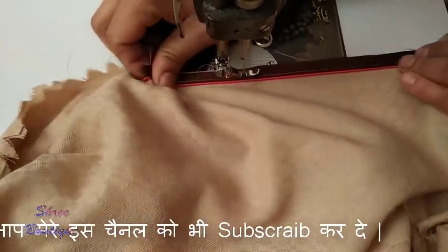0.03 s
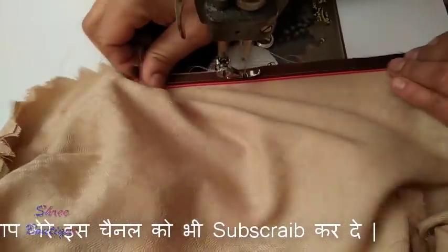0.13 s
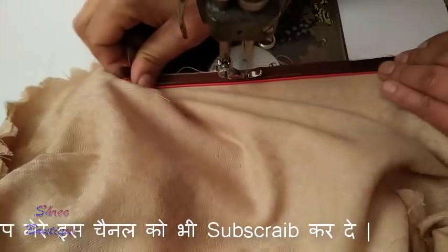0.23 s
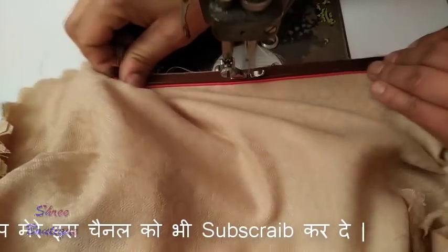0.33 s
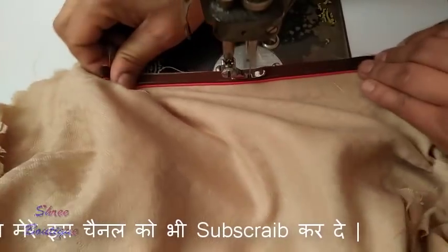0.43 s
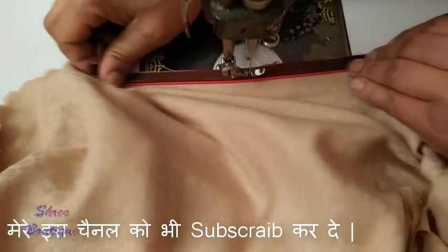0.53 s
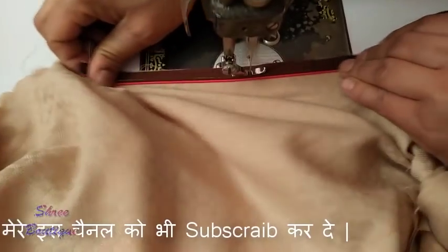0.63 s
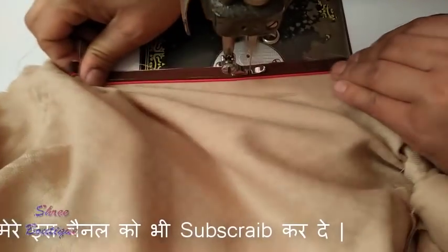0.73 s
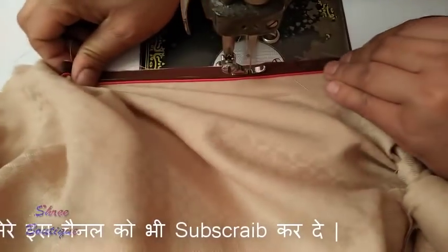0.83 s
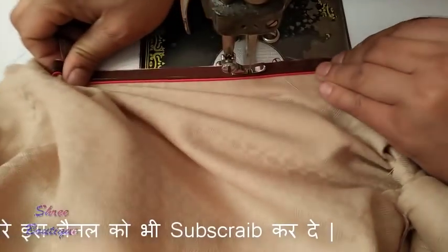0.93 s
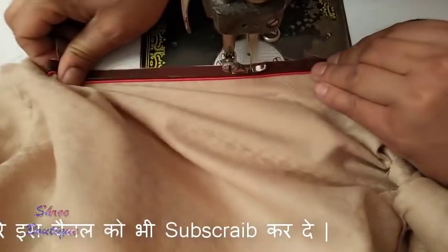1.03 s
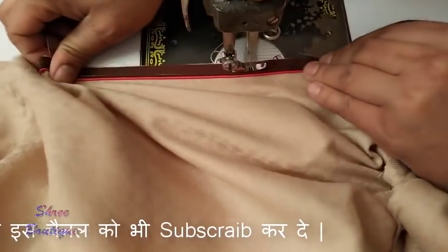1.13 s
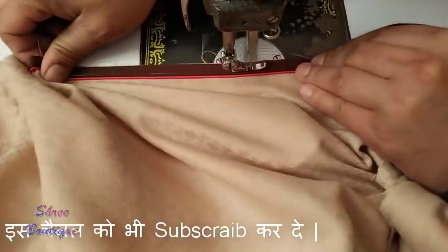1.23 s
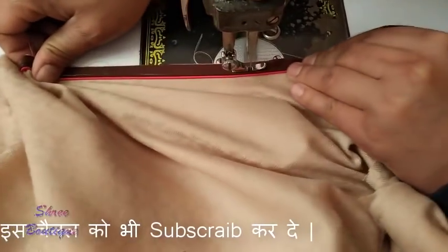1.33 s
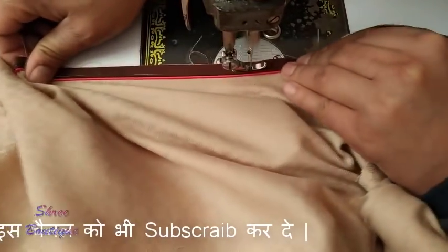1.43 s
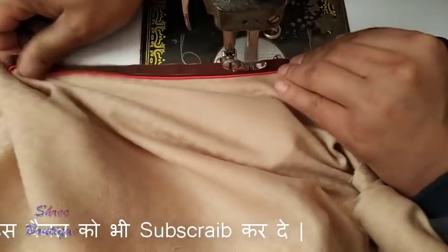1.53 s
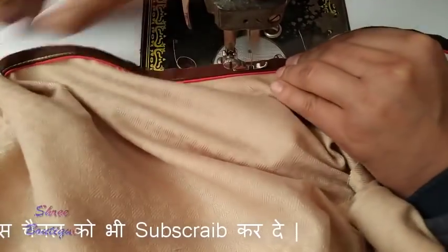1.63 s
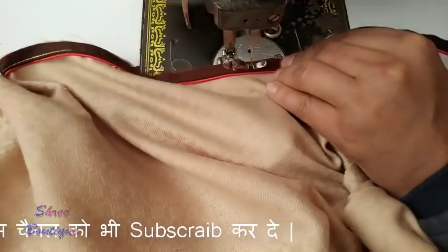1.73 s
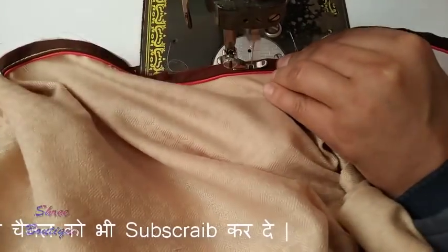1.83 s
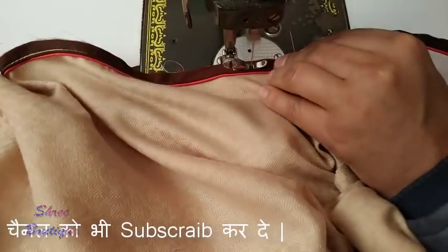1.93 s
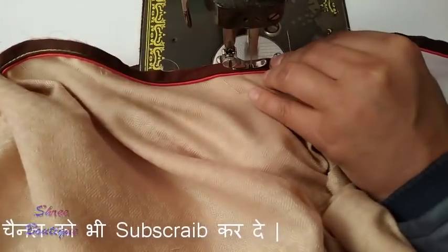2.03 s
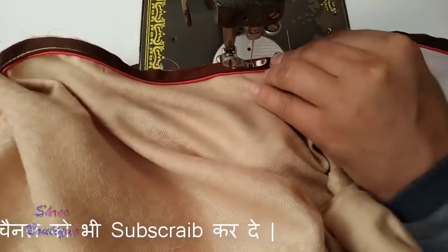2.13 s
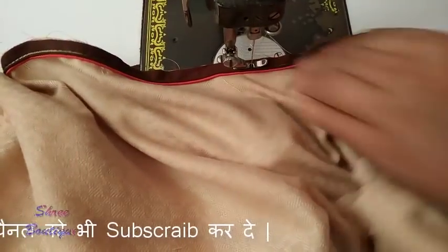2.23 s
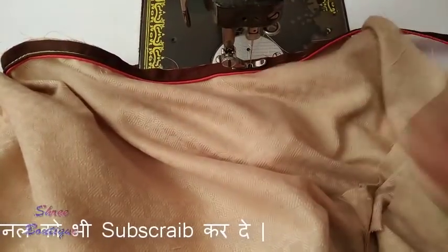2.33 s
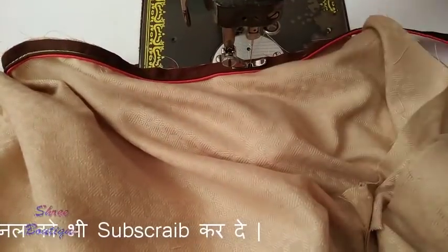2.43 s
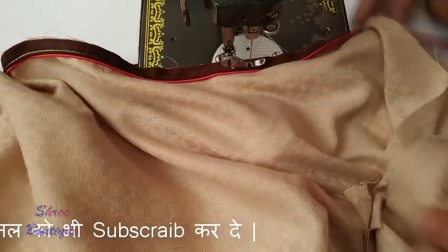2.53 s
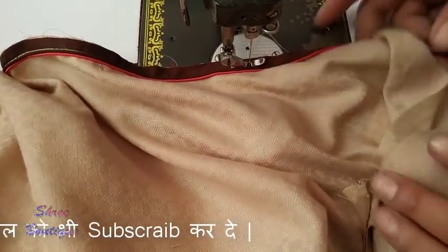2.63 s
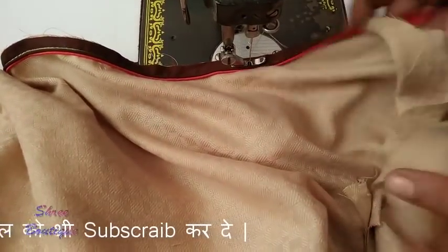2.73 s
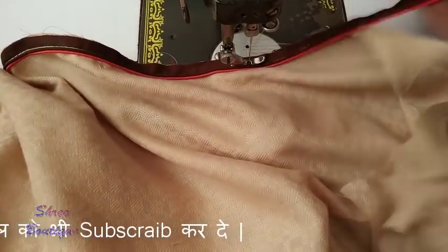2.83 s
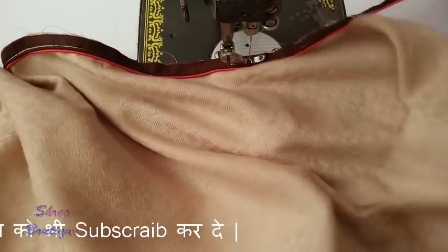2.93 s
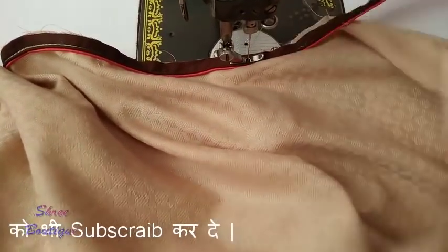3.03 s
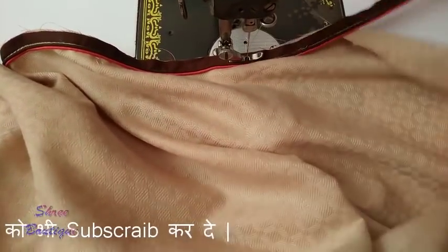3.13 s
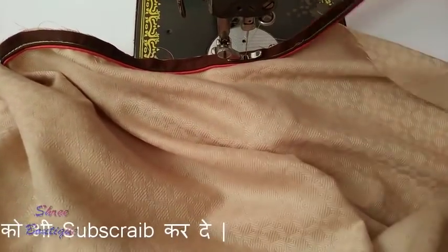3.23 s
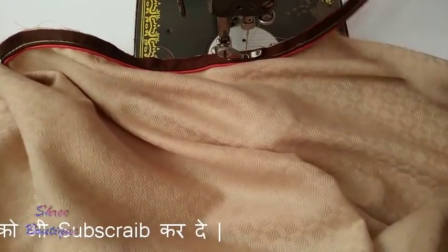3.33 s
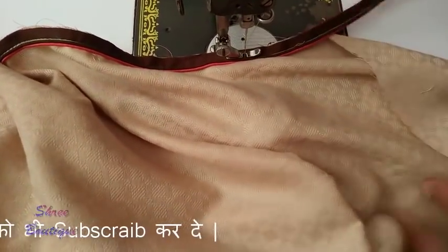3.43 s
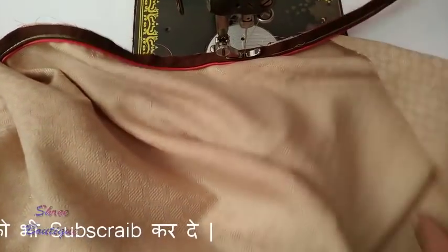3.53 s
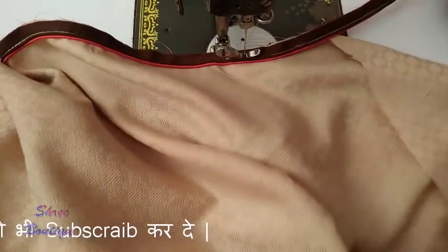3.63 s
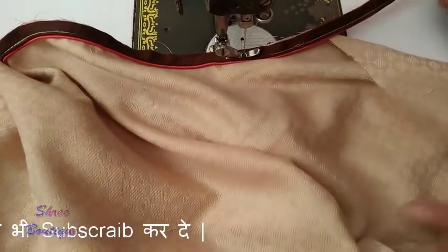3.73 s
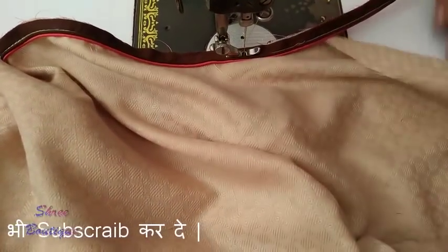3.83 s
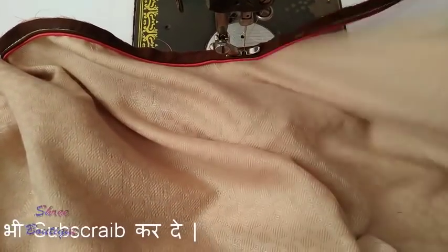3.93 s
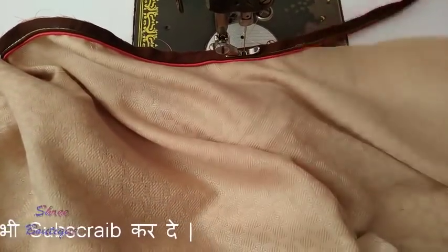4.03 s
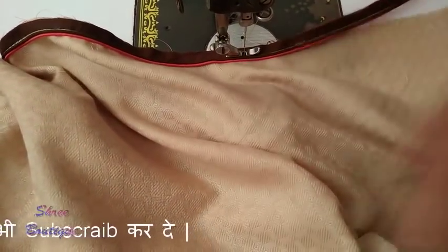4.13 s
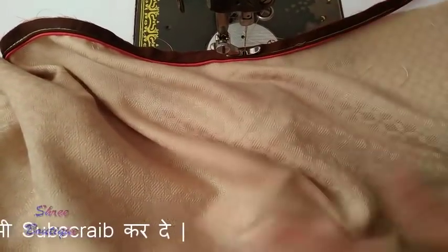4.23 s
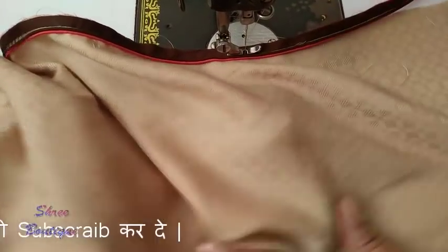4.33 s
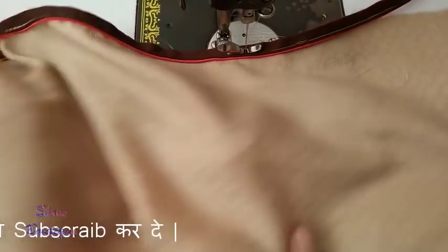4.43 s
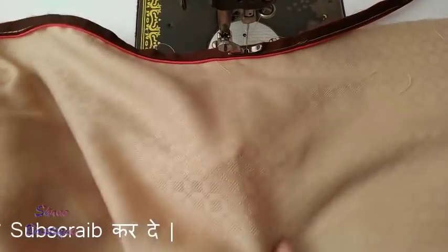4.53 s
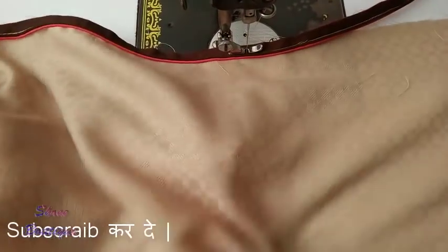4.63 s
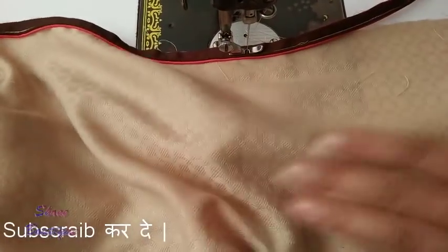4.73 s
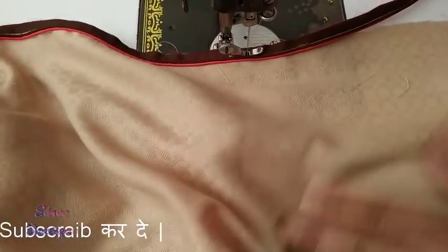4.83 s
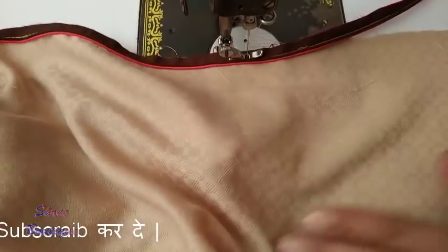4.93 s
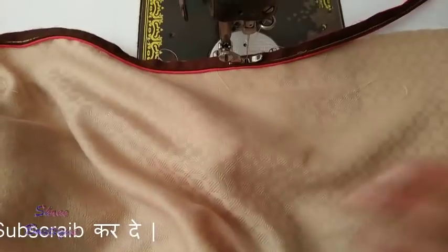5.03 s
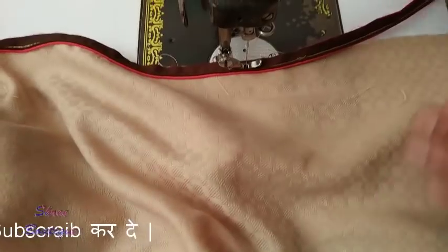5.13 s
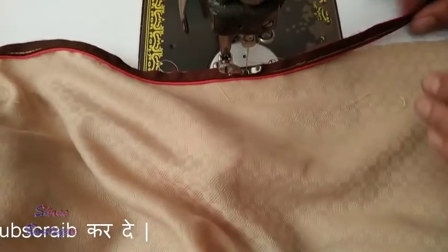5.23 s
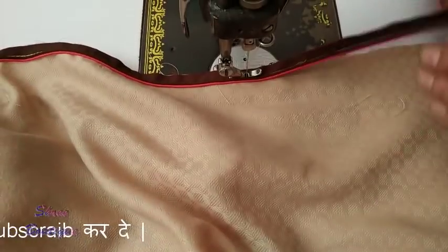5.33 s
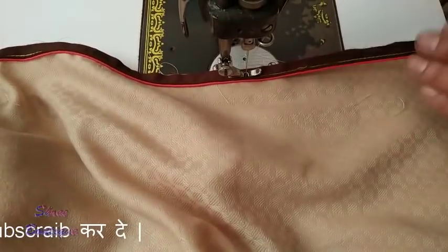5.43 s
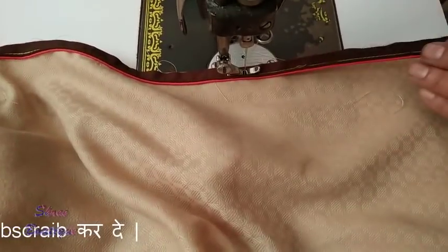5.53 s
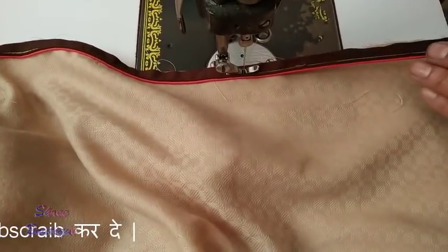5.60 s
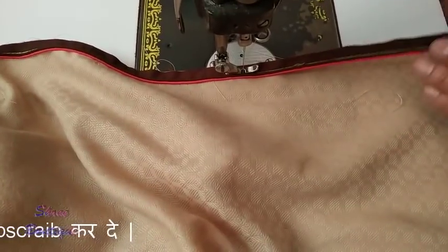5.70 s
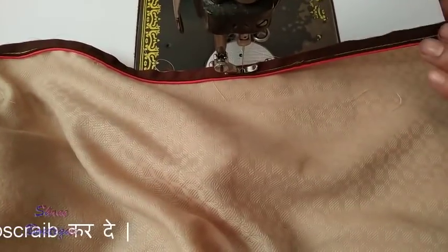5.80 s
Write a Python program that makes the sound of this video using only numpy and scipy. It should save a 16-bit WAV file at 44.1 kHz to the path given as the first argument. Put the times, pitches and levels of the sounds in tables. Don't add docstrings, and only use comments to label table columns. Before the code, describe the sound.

A loud, dense mechanical clatter opens at once: steel shuttle ticks, ringing iron casting, fast table knocks and a low hum. It loosens into separate ticks and stops by about 2.3 seconds. Much quieter handling follows, with crisp fabric swishes, dull wooden bumps, low air puffs and small metallic pings. A faint distant hoot pulses behind. Close stereo phone pickup, small indoor room.

```python
import sys
import numpy as np
from scipy import signal
from scipy.fft import rfft, irfft, next_fast_len
from scipy.io import wavfile
from scipy.ndimage import uniform_filter1d

SR = 44100
rng = np.random.default_rng(int(sys.argv[2]) if len(sys.argv) > 2 else 0)


def elevation(decibels):
    levels = np.asarray(decibels, float)
    return 10 ** (levels / 20)


def dump_mix(stems):
    frames = np.atleast_2d(stems).T
    limited = np.clip(frames, -1, 1)
    pcm = np.round(limited * 32767).astype(np.int16)
    wavfile.write(sys.argv[1], SR, pcm)


N = 258646


def evened(x):
    return x / np.sqrt(np.mean(x ** 2) + 1e-20)


def read(points, hz):
    f, value = np.transpose(points)
    return np.interp(np.log(hz + 1), np.log(f + 1), value)


def gains(rows, column):
    rows = np.array(rows)
    return elevation(np.interp(np.arange(N) / SR, rows[:, 0], rows[:, column], left=-120, right=-120))


def swells(rows, edge_db):
    t = np.arange(N) / SR
    power = 0
    for s, rise, fall, db in rows:
        away = np.maximum((s - t) / rise, (t - s) / fall)
        power = power + elevation(db + edge_db * away) ** 2
    return np.sqrt(power)


def coloured(x, points):
    log_gain = np.log(elevation(read(points, abs(np.fft.fftfreq(4096, 1 / SR)))))
    taps = np.fft.ifft(np.exp(log_gain - 1j * signal.hilbert(log_gain).imag)).real[:2048]
    return signal.oaconvolve(x, taps)[:len(x)]


def ringing(x, modes):
    out = np.zeros(len(x))
    for hz, width_hz, db in modes:
        out += elevation(db) * signal.lfilter(*signal.iirpeak(hz, hz / width_hz, SR), x)
    return out


def impacts(per_s, spread_db):
    sign, size, chance = rng.choice([-1., 1.], N), rng.exponential(1, N), rng.random(N)
    return evened(sign * elevation(spread_db * np.minimum(size, 4)) * (chance < per_s / SR))


def struck(modes, soft_ms):
    t = np.arange(SR // 2) / SR
    ring = sum(elevation(db - 60 * t / t60) * np.sin(2 * np.pi * hz * t) for hz, db, t60 in modes)
    push = np.hanning(max(round(soft_ms * SR / 1000), 1) + 2)
    out = signal.lfilter(*signal.butter(3, 100, "high", fs=SR), signal.oaconvolve(ring, push))
    return out / abs(out).max()


def add(mix, s, sound):
    part = mix[round(s * SR):][:len(sound)]
    part += sound[:len(part)]


# (frequency [Hz], level [dB per Hz])
ROOM_TONE = [(15, -39.5), (25, -7.5), (226, -2), (410, -12), (634, -13), (706, -12), (1280, -16),
             (1640, -18), (1980, -15), (8370, -20.5), (9580, -12), (15200, -34), (16500, -17)]
ROOM_TONE_DB = -60.5


def room_tone():
    shared, left, right = (coloured(v, ROOM_TONE) for v in rng.standard_normal((3, N)))
    bass = signal.lfilter(*signal.butter(2, 800, fs=SR), shared)
    treble = signal.lfilter(*signal.butter(1, 500, "high", fs=SR), np.array([left, right]))
    fan = evened(ringing(rng.standard_normal(N), [(106.3, 7.17, 0)]))
    return elevation(ROOM_TONE_DB) * (evened(bass + treble) + elevation(-7.0) * fan)


# (time [s], level [dB])
HOOTS = [(2.37, -61.5), (3.021, -63), (3.08, -61), (3.28, -61), (3.47, -61.5), (3.55, -70.5), (3.619, -69),
         (3.8, -69), (4.21, -57.5), (4.74, -63.5), (5.127, -62), (5.16, -62), (5.21, -62), (5.46, -60)]
HOOT_S = 0.03


def hoot():
    tone = ringing(ringing(rng.standard_normal(N), [(820, 25, 0)]), [(813, 160, 0)])
    return swells([(s, HOOT_S, HOOT_S, db) for s, db in HOOTS], edge_db=-15.0) * evened(tone)


# (time [s], frequency [Hz], level [dB], t60 [s])
PINGS = [(2.555, 335, -46.5, 0.27), (2.613, 1860, -48, 0.014), (2.626, 2130, -41.5, 0.013),
         (2.685, 385, -52, 0.22), (2.735, 373, -47, 0.071), (3.118, 2070, -52, 0.026),
         (3.239, 2000, -47, .012), (5.034, 2090, -49, .015), (5.344, 2050, -49, .015),
         (5.285, 703, -46, 0.096), (4.93, 700, -55, .1), (5.753, 568, -53, .06)]


def pings():
    out, t = np.zeros(N), np.arange(SR // 4) / SR
    for s, hz, db, t60 in PINGS:
        onset = np.minimum(t / 0.0013, 1)
        add(out, s, onset * elevation(db - 60 * t / t60) * np.sin(2 * np.pi * hz * t))
    return out


# (time [s], level [dB])
PUFFS = [
    (3.049, -63.5),
    (3.46, -63),
    (3.981, -39),
    (4.36, -47),
    (4.62, -66),
    (4.91, -47.5),
    (5.24, -71),
]
PUFF_S, STILL_AIR_DB = 0.032, -68.5


def puffs():
    air = ringing(ringing(rng.standard_normal(N), [(33.7, 62, 0)]), [(34.1, 11, 0)])
    gusts = swells([(s, PUFF_S, PUFF_S, db) for s, db in PUFFS], edge_db=-13.0)
    return (elevation(STILL_AIR_DB) + gusts) * evened(air)


# (frequency [Hz], level [dB per Hz])
CLOTH = [(150, -34), (250, -5.5), (446, -6), (495, -23), (541, -12), (1110, -12.5), (2240, -16),
         (3920, -14.5), (7400, -7), (9300, 0), (10600, -4), (15100, -11), (16500, -26.5)]
# (loudest at [s], rise [s], fall [s], level [dB])
DRAGS = [(2.62, 0.26, 0.41, -58.5), (2.89, 0.59, 0.3, -54.5), (3.07, 0.17, 0.14, -56.5),
         (3.54, 0.097, 0.12, -50), (3.69, 0.049, 0.043, -54.5), (3.98, 0.098, 0.046, -47.5),
         (4.14, 0.089, 0.051, -48), (4.33, 0.096, 0.18, -53.5), (4.39, 0.032, 0.056, -53),
         (4.49, 0.11, 0.1, -45), (4.63, 0.071, 0.06, -52.5), (4.905, 0.017, 0.039, -45),
         (4.99, 0.06, 0.056, -50.5), (5.14, 0.034, 0.054, -59.5), (5.242, .006, 0.052, -55),
         (5.45, 0.15, 0.43, -54), (5.84, 0.1, 0.083, -52.5)]
DRAG_EDGE_DB = -12


def cloth():
    crackle = impacts(per_s=5100, spread_db=4.5) + 0.38 * rng.standard_normal(N)
    return swells(DRAGS, DRAG_EDGE_DB) * evened(coloured(crackle, CLOTH))


# (frequency [Hz], level [dB], t60 [s])
TABLE_SOFT = [(103.2, -37, .3), (150.5, -7.5, 0.49), (160.5, 2, 0.24), (201.2, -13.5, 0.6),
              (260, -12, 0.068), (352, -1.5, 0.088), (410.3, -3, 0.14), (459, -8.5, 0.21),
              (537, -11, 0.082), (635, -7, 0.094), (884, -18, 0.085), (1033, -9, 0.12)]
# (time [s], peak level [dB], softness [ms], snap level [dB])
BUMPS = [(2.272, -56, 1.3, -36.5), (2.335, -65, 0.91, -39.5), (2.489, -32, 1.8, -44.5),
         (2.565, -51, 1.7, -46), (2.626, -49, 1.1, -39), (2.69, -44.5, 1.1, -64), (2.738, -53, 1.02, -48),
         (3.477, -44.5, 5.3, -72), (3.661, -47.5, 2.1, -58), (3.913, -46.5, 2.8, -56),
         (4.013, -46.5, 0.61, -45), (4.35, -33, 2.3, -68), (4.44, -39.5, 4.3, -53),
         (4.893, -43.5, 1.2, -48), (4.899, -40, 1.8, -50), (4.907, -31, 1.03, -52), (4.911, -42, 1.3, -52),
         (4.953, -46, 1.8, -60), (4.975, -58, 1.5, -62), (5.237, -26.5, 1.43, -32), (5.345, -49, 2.1, -46),
         (5.441, -51, 0.95, -41), (5.753, -51, 0.68, -47)]
RUB_DB, RUB_FALL_S, RUB_STILL_DB = -21.5, 0.19, -76


def bumps():
    out = np.zeros(N)
    for s, db, soft_ms, _ in BUMPS:
        add(out, s, elevation(db) * struck(TABLE_SOFT, soft_ms))
    rubbed = ringing(rng.standard_normal(N), [(152.0, 18, 1.5), (197.6, 17, -17.5), (401, 51, -22.5)])
    rests = swells([(s + 0.015, .03, RUB_FALL_S, db + RUB_DB) for s, db, *_ in BUMPS], edge_db=-16.0)
    return out + (elevation(RUB_STILL_DB) + rests) * evened(rubbed)


# (frequency [Hz], level [dB per Hz])
SNAP = [(150, -30), (500, -8.5), (1500, -9), (4000, -13.5), (9000, -3.5), (15000, -22)]
BODY_DB, BODY_T60_S = -13, 0.069


def snaps():
    out, t = np.zeros((2, N)), np.arange(5000) / SR
    noises = rng.standard_normal((len(BUMPS), 2, len(t)))
    for (s, db, soft_ms, snap_db), noise in zip(BUMPS, noises):
        snap = np.array([coloured(v * elevation(-60 * t / 0.02), SNAP) for v in noise])
        scuff = np.array([ringing(v[::-1], [(704, 360, 2), (1880, 820, -15.0)]) for v in noise])
        scuff_gain = elevation(db + BODY_DB - 60 * t / BODY_T60_S) / soft_ms
        add(out.T, s, elevation(snap_db) * snap.T / abs(snap.mean(0)).max())
        add(out.T, s, (scuff_gain * evened(scuff)).T)
    return out


# (time [s], level [dB])
EFFORT = [(0.0, -16.5), (0.04, -25.5), (0.14, -24), (0.23, -27), (0.6, -26), (0.82, -23), (1.04, -25),
          (1.2, -22), (1.41, -23.5), (1.65, -26.5), (1.9, -30), (2.05, -33), (2.13, -40), (2.24, -57),
          (2.45, -68)]
ROCK_START_S, ROCK_RISE_S, ROCK_END_S, ROCK_FALL_S = 0.018, 0.073, 0.67, 0.26


def driven(level_db, rock_db, slope):
    clock, full = np.arange(N) / SR, elevation(-21)
    rise = (clock - ROCK_START_S) / ROCK_RISE_S
    fall = 1 + (ROCK_END_S - clock) / ROCK_FALL_S
    rocking = np.clip(np.minimum(rise, fall), 0, 1)
    return full * (gains(EFFORT, column=1) / full) ** slope * elevation(level_db + rock_db * rocking)


# (loudest at [s], rise [s], fall [s], level [dB])
COVER_FITS = [
    (.03, .04, 0.06, -33.5),
    (.15, .06, .1, -29.5),
    (.30, .05, .05, -38),
    (.65, .07, 0.064, -30.5),
    (.48, .1, .1, -42.5),
    (1.2, .1, 0.195, -35),
]


def cover_buzz():
    modes = [(910, 140, 4.0), (1100, 150, -4), (850, 150, -4), (660, 49, 0.5)]
    return swells(COVER_FITS, edge_db=-7.5) * evened(ringing(rng.standard_normal(N), modes))


# (loudest at [s], rise [s], fall [s], level [dB])
TABLE_HUM = [
    (.33, .06, 0.087, -16.5),
    (.45, .08, 0.15, -20.5),
]
TABLE_HUM_HZ = 202.2


def table_hum():
    tone = np.sqrt(2) * np.sin(2 * np.pi * TABLE_HUM_HZ * np.arange(N) / SR)
    return swells(TABLE_HUM, edge_db=-11.0) * tone


# (time [s], rate [turns per s], level [dB])
SHAFT = [(0.738, 40, -36.5), (1.08, 32.5, -38), (1.193, 35, -38), (1.329, 32, -39), (1.406, 44, -48.5),
         (1.536, 27, -46.5), (1.725, 44, -35.5), (1.78, 74, -50)]
# (multiple of the turn rate, level [dB])
SHAFT_ORDERS = [(1, -0.5), (2, -10), (3, -0.5)]


def shaft():
    s, hz, _ = np.transpose(SHAFT)
    turns = np.cumsum(np.interp(np.arange(N) / SR, s, hz)) / SR
    orders = sum(elevation(db) * np.sin(2 * np.pi * k * turns) for k, db in SHAFT_ORDERS)
    return np.sqrt(2) * gains(SHAFT, column=2) * orders


# (frequency [Hz], level [dB], t60 [s])
TABLE_HARD = [(111.4, -6, 0.27), (144.3, 0.5, 0.16), (166.2, 0.5, 0.11), (205.5, -5, 0.25),
              (275, -1.5, 0.061), (385, -13.5, 0.058), (507, -10, 0.037), (677, -11, 0.071),
              (325, -3.5, 0.024), (938, -8.5, .07)]
DRONE_DB, DRONE_ROCK_DB, DRONE_SLOPE = -9.5, 13, 0.68


def drone():
    modes = [(hz, 2.6 / t60, db) for hz, db, t60 in TABLE_HARD[:4]] + [(74.9, 37, -13.5)]
    body = evened(ringing(impacts(per_s=830, spread_db=4.0), modes))
    body = signal.lfilter(*signal.butter(2, 520, fs=SR), body)
    return driven(DRONE_DB, DRONE_ROCK_DB, DRONE_SLOPE) * body


# (time [s], blow level [dB])
ROCK_KNOCKS = [(0.028, -5), (0.0757, -5), (0.122, -8.5), (0.167, -6.5), (0.2175, -8), (0.258, -2),
               (0.2985, -4.5), (0.339, -3), (0.372, -6), (0.41, -3), (0.4499, -3), (0.4898, -5),
               (0.5317, -5), (0.5735, -6.5), (0.617, -3.5), (.6630, -2), (0.7074, -5)]
# (time [s], blow level [dB])
KNOCKS = [
    (0.7423, -18),
    (0.7649, -14.5),
    (1.6979, -11.5),
    (1.732, -13.5),
    (1.831, -20),
    (1.925, -22),
    (2.059, -25.5),
]
SHOVE_MS, SHOVE_DB = 5.14, -9


def knocks():
    out = np.zeros(N)
    knock = struck(TABLE_HARD, soft_ms=1.3)
    shove = elevation(SHOVE_DB) * np.hanning(round(SHOVE_MS * SR / 1000))
    for s, db in ROCK_KNOCKS + KNOCKS:
        add(out, s, elevation(db) * knock)
        add(out, s, elevation(db) * shove)
    return out


# (frequency [Hz], width [Hz], level [dB])
CASTING = [(272.3, 17, -2.5), (302.6, 17.2, 12), (343.4, 95, 6.5), (389.8, 23.4, 9.5), (453, 20, -36.5),
           (510, 30, -9), (646, 12, -2.5), (670, 14, -3), (804, 92, -9.5), (909, 52, -6), (1020, 60, -11),
           (1298, 26, -22)]
RATTLE_DB, RATTLE_ROCK_DB, RATTLE_SLOPE = -1.5, 4.5, 1


def rattle():
    jolts = impacts(per_s=640, spread_db=-1.0) + 0.34 * rng.standard_normal(N)
    return driven(RATTLE_DB, RATTLE_ROCK_DB, RATTLE_SLOPE) * evened(ringing(jolts, CASTING))


# (frequency [Hz], level [dB per Hz])
STEEL = [(710, -15.5), (1200, -20), (1400, -1.5), (1560, -14), (2590, -4.5), (3920, -7), (6500, -3),
         (7830, -5), (8930, 1), (10300, -4), (13700, -16.5), (15300, -11.5), (15800, -12), (16300, -20)]
# (frequency [Hz], width [Hz], level [dB])
PARTS = [(2164, 160, -2.5), (2600, 19, 4), (3660, 96, -16), (6700, 270, -13), (8570, 510, -7),
         (9070, 52, -12), (9810, 400, -7.5), (12300, 330, -11)]


def steel(x, ring_db):
    return coloured(x, STEEL) + elevation(ring_db) * ringing(x, PARTS)


# (time [s], peak level [dB])
TICKS = [(0.0044, -8.5), (0.0164, -19), (0.039, -12.5), (0.062, -19), (0.1354, -7.5), (0.164, -16),
         (0.2008, -9), (0.335, -12), (0.361, -14.5), (0.4134, -14.5), (0.4578, -11), (0.499, -19),
         (0.544, -18), (0.628, -11), (0.7194, -14.5), (0.7487, -8), (0.7668, -6), (0.8018, -12),
         (0.826, -10.5), (0.8402, -8.5), (0.858, -7), (0.88, -6.5), (0.898, -7), (0.9152, -9),
         (0.939, -10.5), (0.964, -10.5), (0.9796, -13.5), (1.0018, -6.5), (1.0266, -21), (1.046, -9.5),
         (1.071, -7), (1.11, -16.5), (1.168, -7), (1.187, -6), (1.2094, -28), (1.2373, -9.5), (1.256, -30),
         (1.2724, -14), (1.298, -10.5), (1.5658, -10.5), (1.5956, -17), (1.641, -16), (1.6655, -7.5),
         (1.717, -5), (1.7463, -6.5), (1.782, -13.5), (1.803, -16), (1.8354, -10), (1.878, -24.5),
         (1.9038, -13), (1.935, -10), (2.0182, -12), (2.0578, -10), (2.1395, -18.5), (2.2219, -20),
         (2.273, -32), (2.3374, -53),
         (0.0674, -12), (0.1568, -12.5), (0.2714, -18.5), (0.3025, -18), (0.376, -15), (0.5604, -18),
               (0.5834, -19.5), (0.6405, -17), (0.6729, -13.5), (0.7014, -13.5), (1.084, -16),
               (1.094, -12.5), (1.1347, -13), (1.1517, -11.5), (1.3063, -11), (1.3204, -11), (1.3544, -11),
               (1.3641, -14), (1.3796, -13.5), (1.4088, -15), (1.4236, -13), (1.4357, -14.5), (1.459, -10),
               (1.4814, -13), (1.5264, -12), (1.6194, -18), (1.7684, -32), (1.9924, -29), (2.0273, -20),
               (2.0704, -25), (2.236, -31)]
TICK_RISE_S, TICK_T60_S = .0003, .012


def shuttle():
    hits = abs(impacts(per_s=4000, spread_db=1.5))
    jolts = hits * rng.choice([-1., 1.], (2, N)) + 0.82 * rng.standard_normal((2, N))
    out = gains(EFFORT, column=1) * evened(np.array([steel(v, ring_db=-1.5) for v in jolts]))
    t, ticks = np.arange(3000) / SR, TICKS
    fade = (1 - np.exp(-t / TICK_RISE_S)) * elevation(-60 * t / TICK_T60_S)
    band = signal.butter(1, [4200, 12000], "band", fs=SR)
    for (s, db), chatter in zip(ticks, rng.standard_normal((len(ticks), 2, len(t)))):
        tick = signal.lfilter(*band, np.array([steel(v * fade, ring_db=8.5) for v in chatter]))
        add(out.T, s, elevation(db + 1.0) * tick.T / abs(tick.mean(0)).max())
    return out


def scatter(t60, start_s):
    taps = np.zeros((2, SR // 2))
    slots = np.arange(round(start_s * SR), SR // 2 - 20, 20)
    at = slots + rng.integers(0, 20, (2, len(slots)))
    np.put_along_axis(taps, at, rng.choice([-1., 1.], at.shape), 1)
    taps *= elevation(-60 * np.arange(SR // 2) / SR / t60)
    return taps / np.linalg.norm(taps, axis=1, keepdims=True)


# (frequency [Hz], likeness [-1 to 1])
SAME = [(60, 1), (290, 0.98), (500, .91), (760, 0.71), (1300, 0.13), (2000, -0.48), (15000, -.5)]
# (frequency [Hz], level [dB])
LEAN = [(60, 0.5), (110, -2), (200, 0.5), (380, -1), (700, -1.5), (1290, -0.5), (2380, -8), (4400, 5.5),
        (8120, 1.5), (15000, -4)]


def lean(hz):
    return elevation(read(LEAN, hz) / 2 * np.array([[1], [-1]]))


def heard(x, count=8):
    size = next_fast_len(N + SR)
    hz = np.fft.rfftfreq(size, 1 / SR)
    same = np.clip(read(SAME, hz), 0, 1)
    place = np.repeat(rng.integers(0, count, N // 700 + 1), 700)[:N]
    ports = np.sqrt(same) * rfft(x, size)
    loose = irfft(np.sqrt(1 - same) * rfft(x, size), size)[:N]
    for k in range(count):
        share = np.sqrt(abs(uniform_filter1d(1. * (place == k), size=300)))
        echoes = scatter(t60=0.008, start_s=0) + elevation(-2.5) * scatter(t60=0.33, start_s=.006)
        ports = ports + rfft(echoes, size) * rfft(loose * share, size)
    return irfft(ports * lean(hz), size)[:, :N]


SHARED_TREBLE, ROOM_T60_S = .15, .27


def paired(pair, room_db):
    size = next_fast_len(N + SR)
    hz = np.fft.rfftfreq(size, 1 / SR)
    same, z = np.clip(read(SAME, hz), 0, 1), rfft(pair, size)
    near = rfft(scatter(t60=.008, start_s=.0004), size)
    apart = np.sqrt(1 - SHARED_TREBLE) * z + np.sqrt(SHARED_TREBLE) * z[0] * near * [[0], [1]]
    apart[0] = z[0]
    z = np.sqrt(same) * z[0] + np.sqrt(1 - same) * apart
    z = z / np.sqrt(1 + 2 * np.sqrt(same * (1 - same)) * np.array([[1], [0]]))
    z = z * (1 + elevation(room_db) * rfft(scatter(t60=ROOM_T60_S, start_s=.006), size))
    return irfft(z * lean(hz), size)[:, :N]


def scene():
    hands = puffs() + cloth() + bumps()
    machine = cover_buzz() + table_hum() + shaft() + drone() + knocks() + rattle()
    bodies = heard(hoot() + pings() + hands + machine)
    return room_tone() + bodies + paired(snaps() + shuttle(), room_db=-9.5)


def overloaded(x, ceiling):
    return ceiling * np.tanh(x / ceiling)


def top_cut(x):
    return signal.sosfilt(signal.butter(12, 16820, fs=SR, output="sos"), x)


def record(dry):
    edge = signal.firwin(511, 15850, window=("kaiser", 9), fs=SR)
    limited = signal.oaconvolve(overloaded(dry, ceiling=0.7), edge[None], "same")
    return top_cut(limited)


dry = scene()
out = record(dry)
dump_mix(out)
```